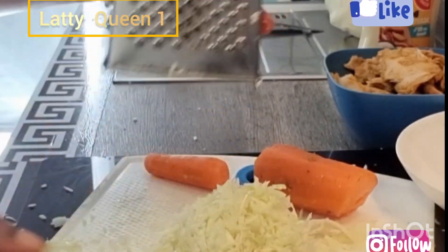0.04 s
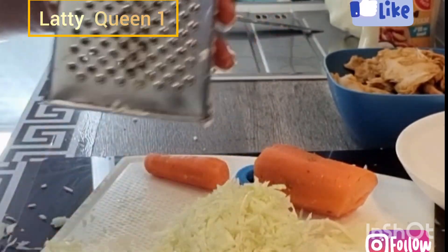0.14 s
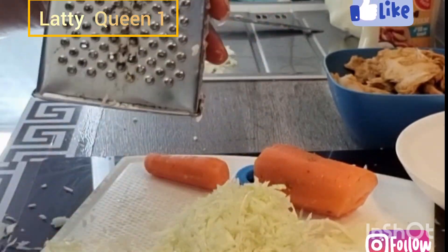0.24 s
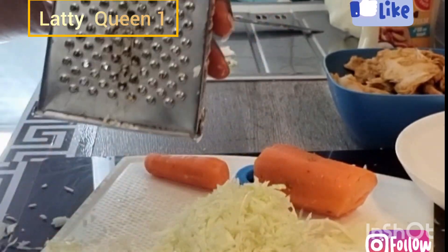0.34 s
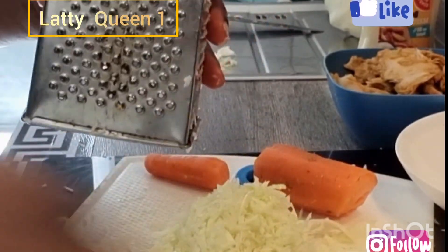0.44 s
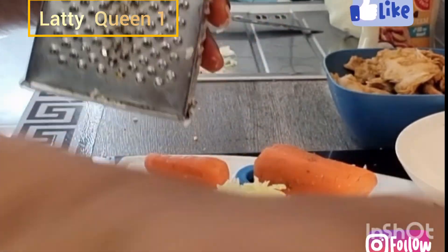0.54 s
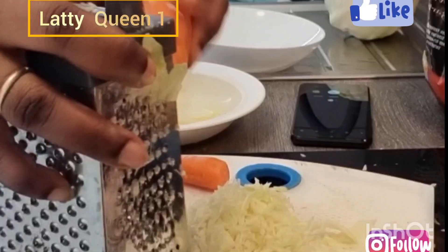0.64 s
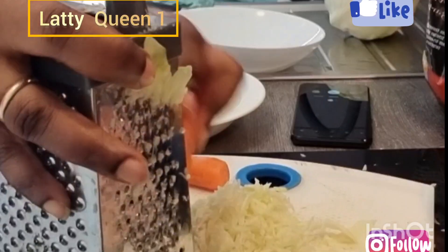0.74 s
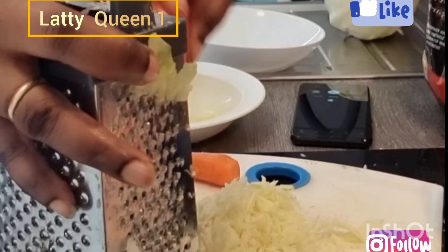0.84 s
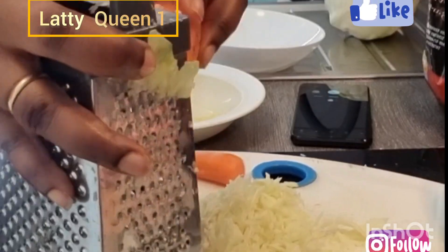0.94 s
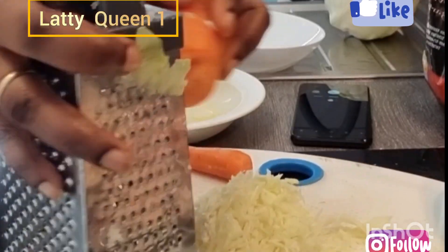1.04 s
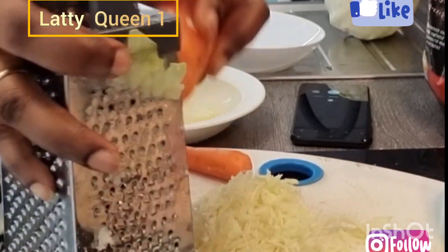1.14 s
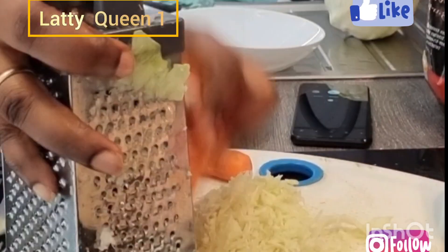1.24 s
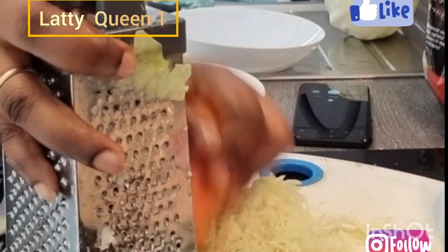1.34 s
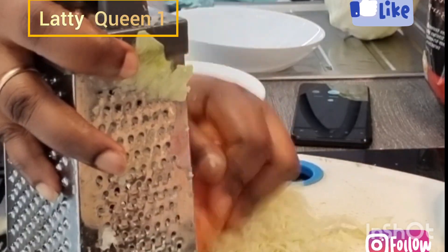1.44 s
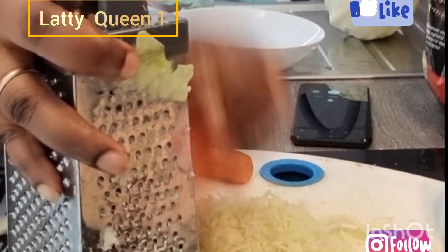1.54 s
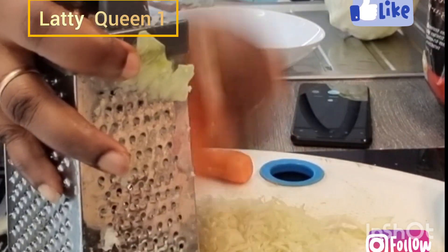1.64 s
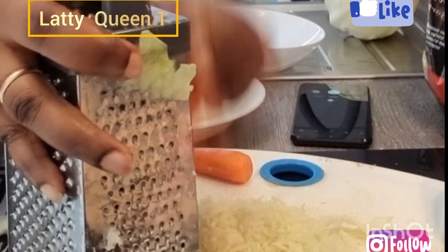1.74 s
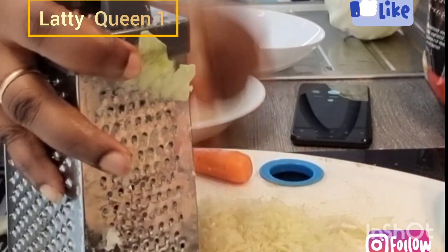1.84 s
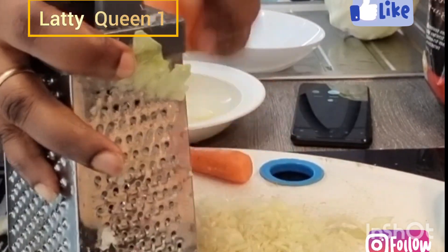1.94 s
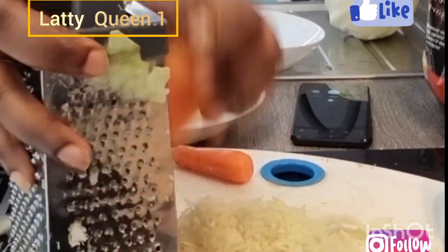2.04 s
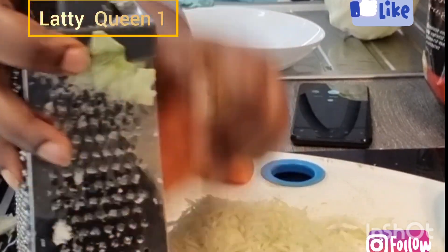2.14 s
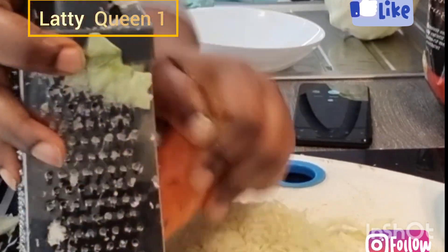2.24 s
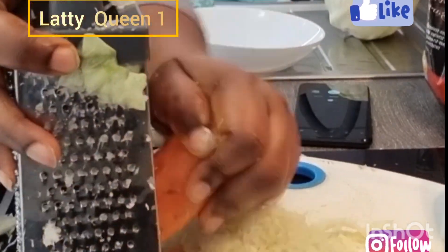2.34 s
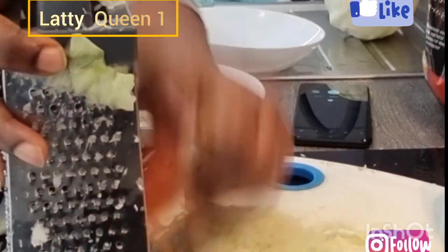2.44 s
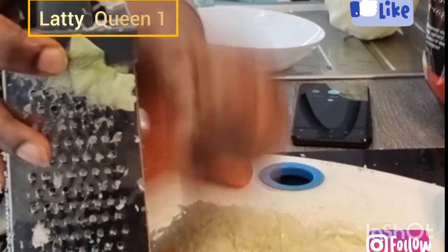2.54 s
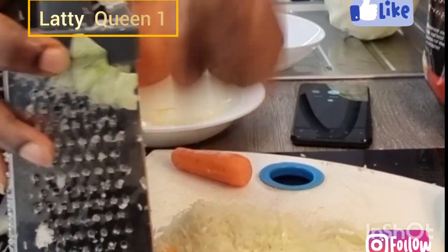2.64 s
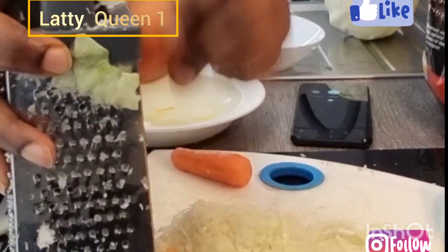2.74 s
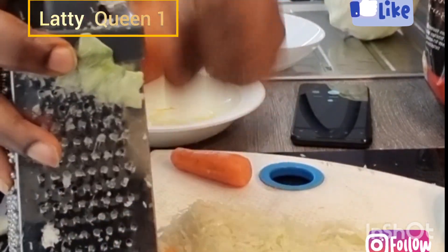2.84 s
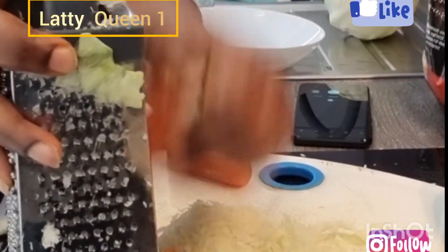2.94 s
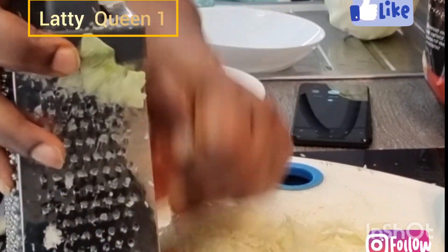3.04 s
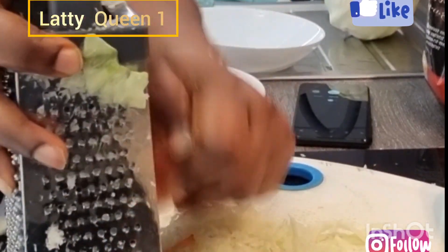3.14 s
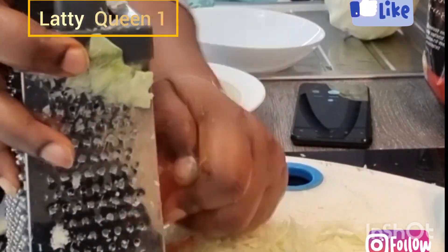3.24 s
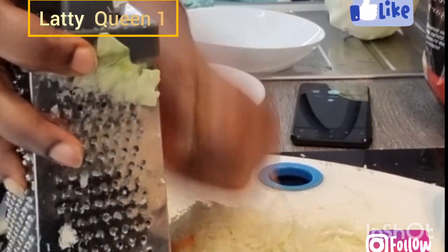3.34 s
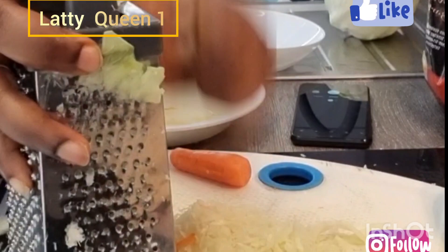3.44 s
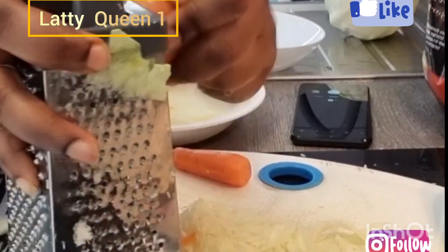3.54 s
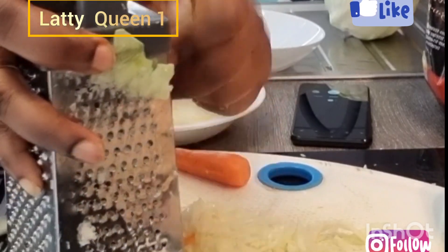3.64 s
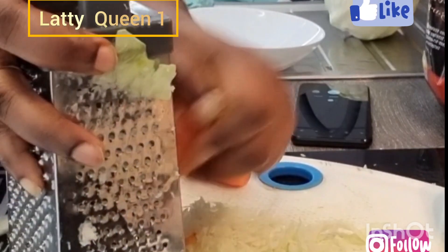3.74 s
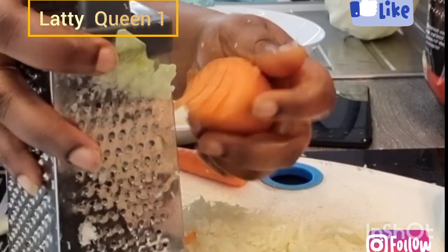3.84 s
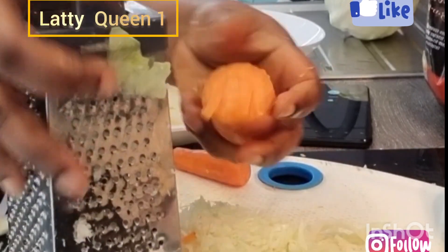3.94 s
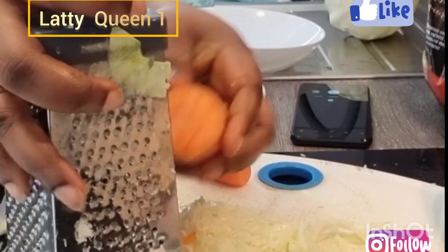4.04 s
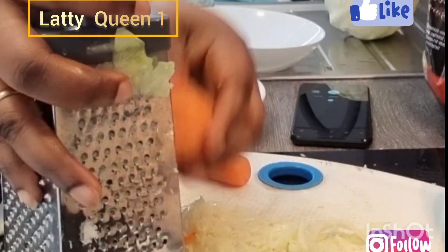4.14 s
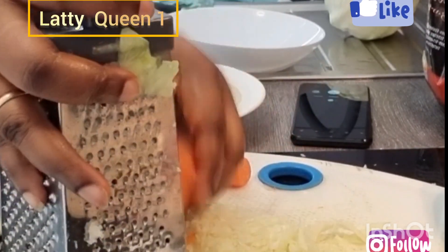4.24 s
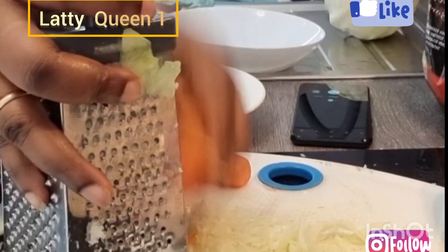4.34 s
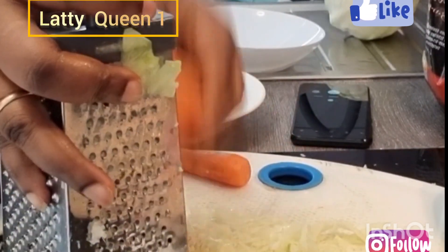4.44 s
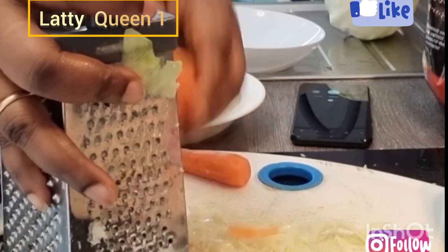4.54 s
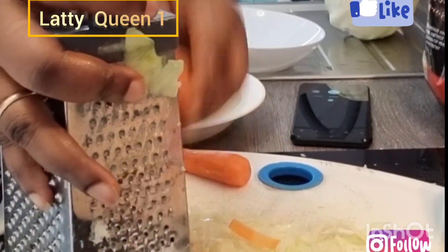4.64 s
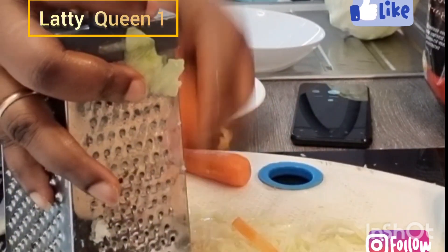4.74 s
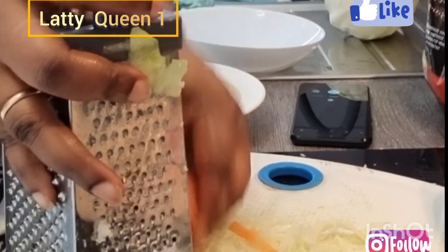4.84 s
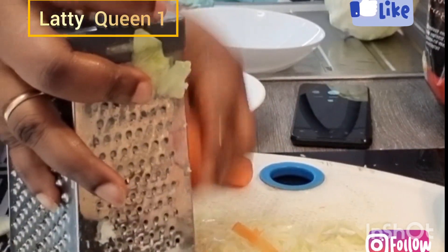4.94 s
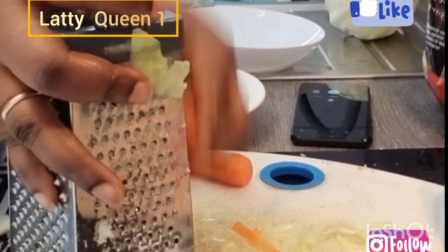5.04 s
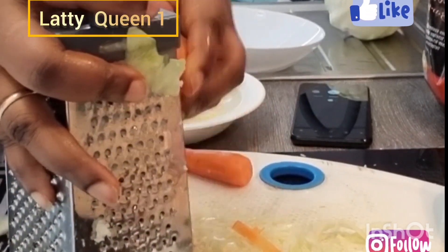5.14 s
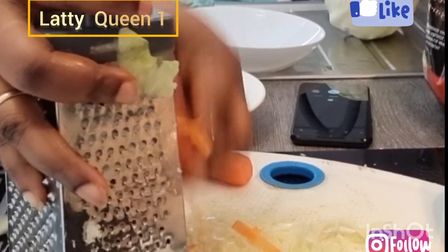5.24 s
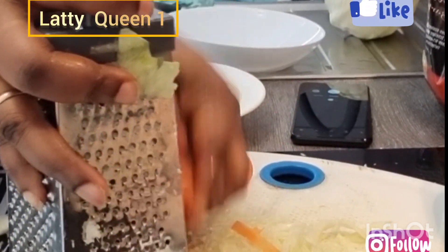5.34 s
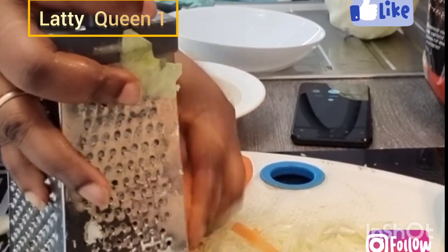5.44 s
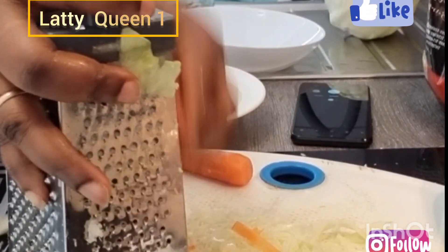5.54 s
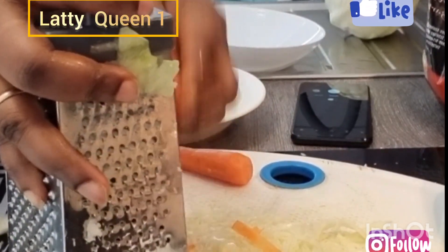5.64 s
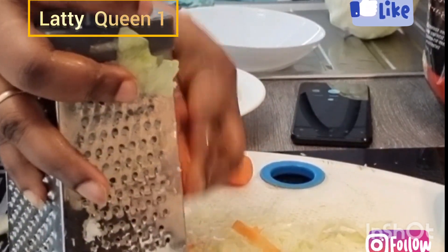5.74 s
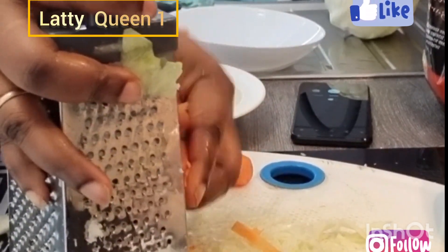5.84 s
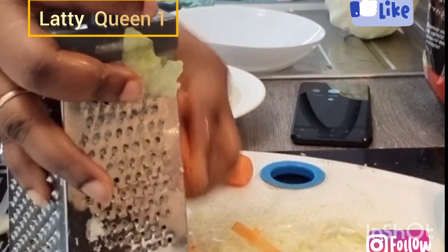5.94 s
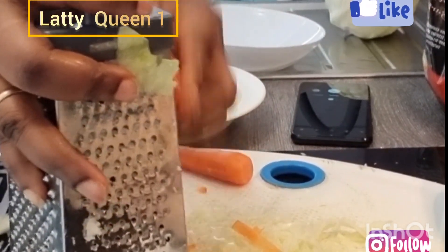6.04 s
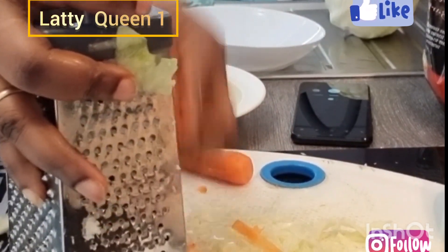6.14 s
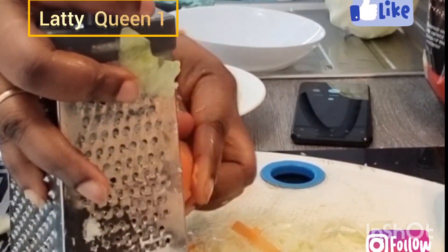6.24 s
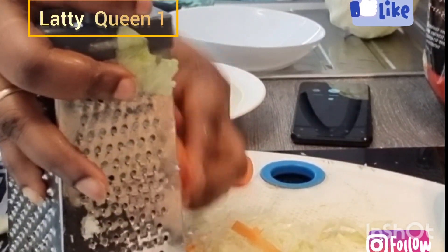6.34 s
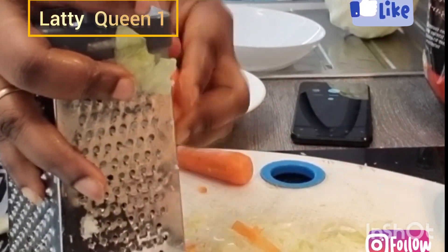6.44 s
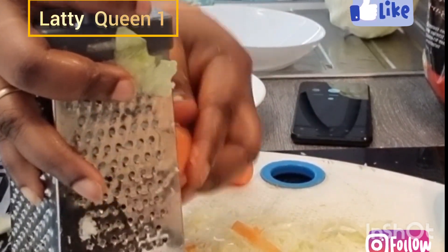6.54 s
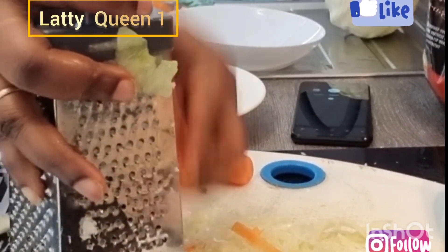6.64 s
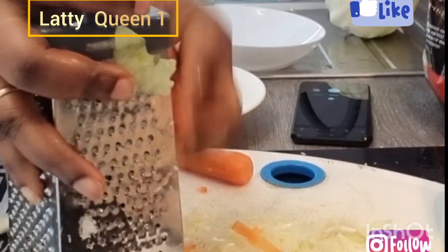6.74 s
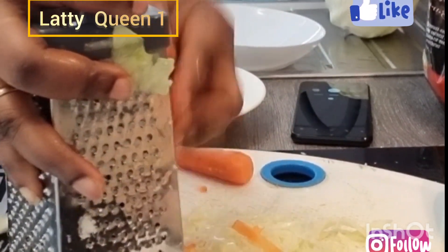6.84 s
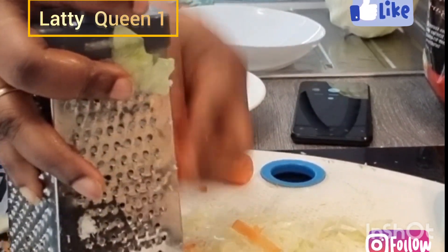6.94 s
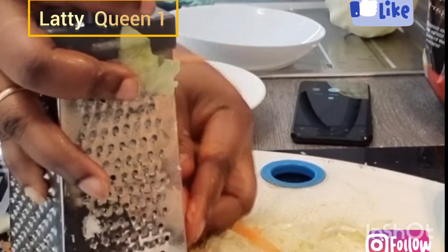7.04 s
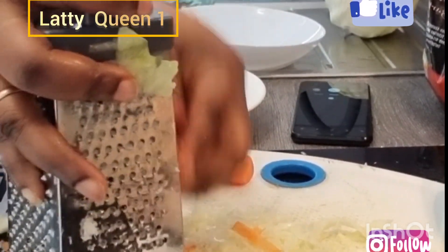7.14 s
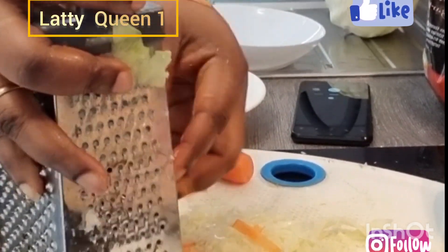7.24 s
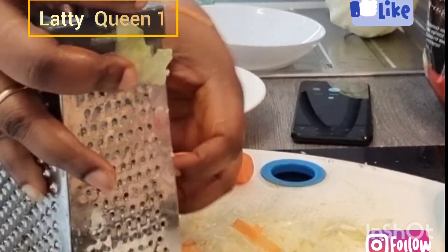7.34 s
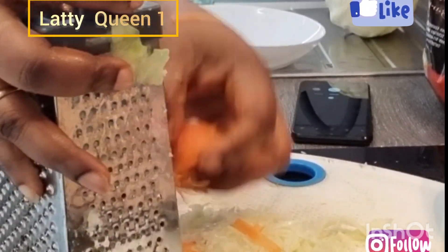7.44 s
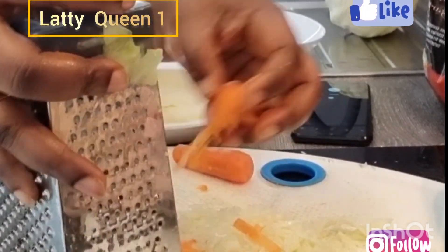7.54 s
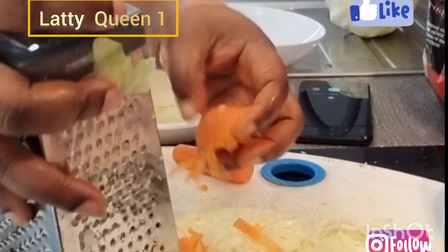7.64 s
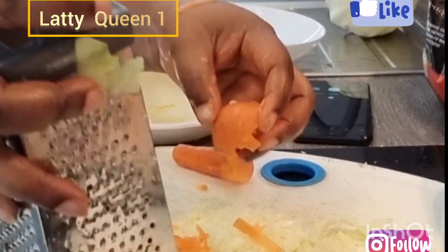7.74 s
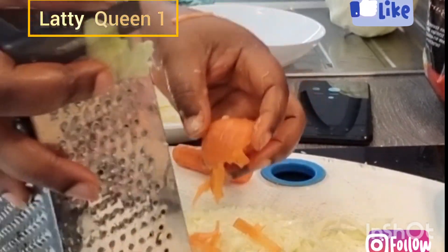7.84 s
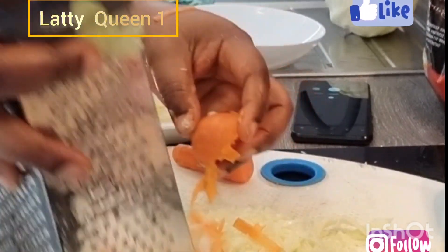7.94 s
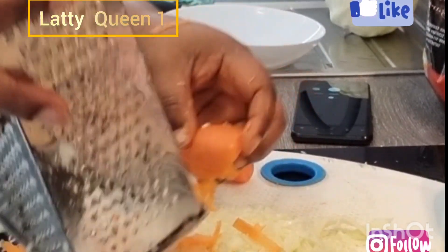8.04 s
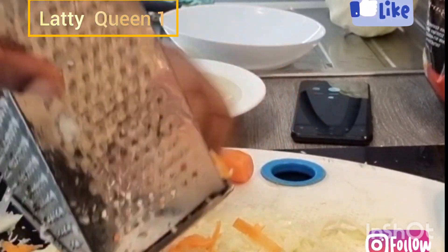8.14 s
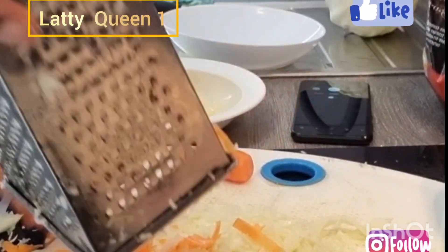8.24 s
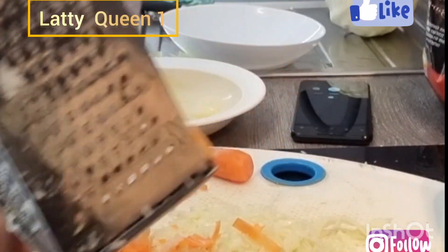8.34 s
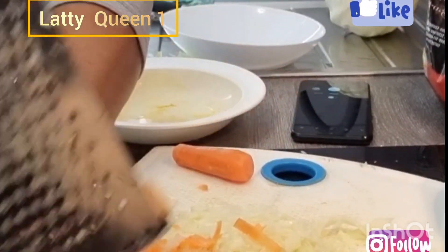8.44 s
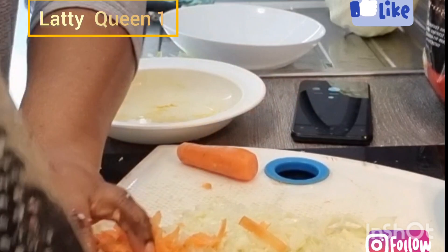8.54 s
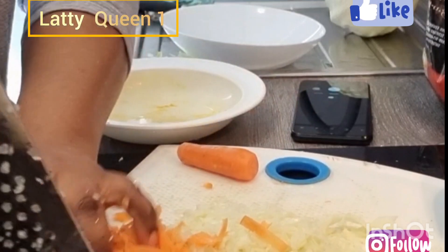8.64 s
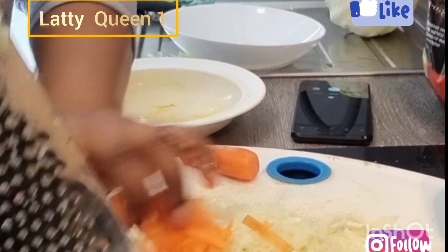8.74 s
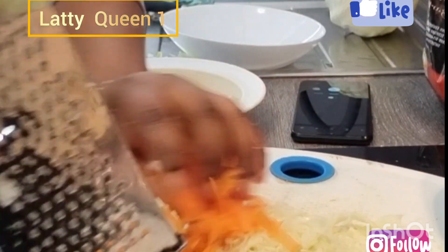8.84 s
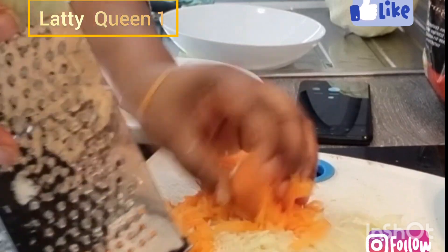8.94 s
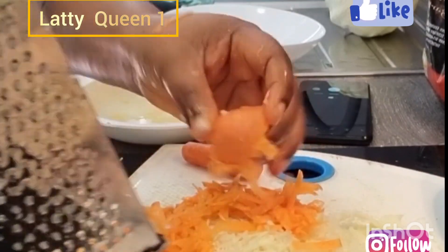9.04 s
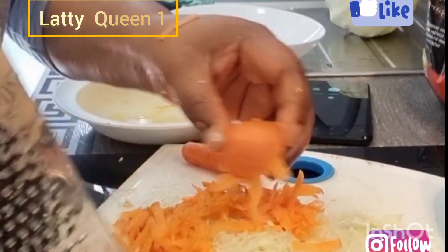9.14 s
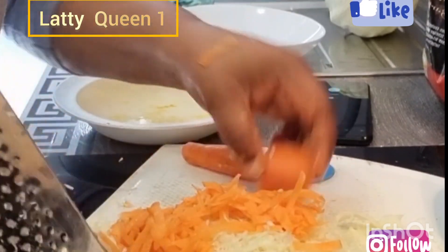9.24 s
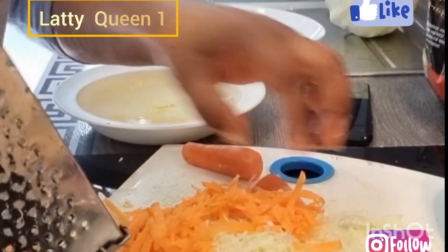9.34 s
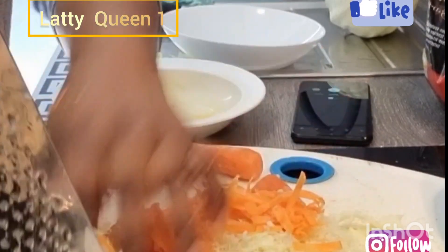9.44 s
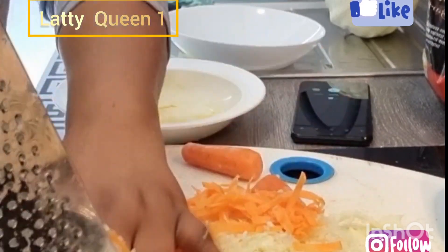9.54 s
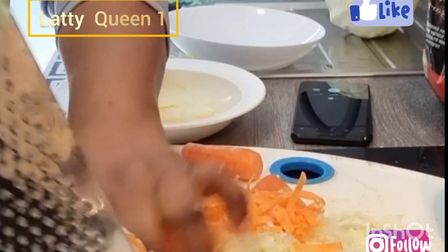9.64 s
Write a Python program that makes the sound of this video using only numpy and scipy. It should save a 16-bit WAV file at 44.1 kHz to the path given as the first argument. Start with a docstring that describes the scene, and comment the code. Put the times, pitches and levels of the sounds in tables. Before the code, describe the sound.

In a kitchen, hands briefly brush a steel box grater as it is set on a chopping board. A carrot is then rasped quickly up and down, close to the microphone, with gritty bites, hollow knocks and dull board thuds. After a short pause comes a second, longer run. A faint thin squeak and a few soft bumps and brushes follow. A low motor hum continues throughout.

```python
"""Grating a carrot in the kitchen

A steel box grater stands on a chopping board, close to a phone's two microphones. A carrot is rasped
fast up and down it: the teeth bite in dense grains, the thin walls ring, the hollow box knocks and the
board thuds. Hands brush things before and after, and the grater squeaks as it tips. Behind it all
are the air of the room and a humming motor."""
import sys
import numpy as np
from scipy import signal
from scipy.fft import rfft, irfft, next_fast_len
from scipy.io import wavfile
from scipy.ndimage import uniform_filter1d, map_coordinates

SR = 44100
rng = np.random.default_rng(int(sys.argv[2]) if len(sys.argv) > 2 else 0)


def dump_mix(stems):
    """Bounce the given channels to the path in sys.argv[1] as a 16-bit WAV at rate SR."""
    frames = np.atleast_2d(stems).T  # one column per channel
    limited = np.clip(frames, -1, 1)  # hard clip at full scale
    pcm = np.round(limited * 32767).astype(np.int16)
    wavfile.write(sys.argv[1], SR, pcm)


N = 427547

# Background noises. Each row: frequency in Hz, relative level in dB.
AIR_COLOUR = [(76, -34), (130, -3.5), (162, -10), (250, -22), (310, -17.5), (384, -14.5), (519, -16),
              (673, -23), (744, -20.5), (1600, -25.5), (1870, -28.5), (3280, -30.5), (8000, -42),
              (9300, -45.5), (11200, -53), (12900, -43), (15700, -46.5)]
RUSTLE_COLOUR = [(180, -32.5), (300, -3.5), (454, -9), (508, -9), (548, -3.5), (1510, -3), (3290, -16.5),
                 (6000, -37.5), (7800, -63.5), (13200, -120)]
RUMBLE_COLOUR = [(12, -38.5), (20, -0.5), (59, 4), (87, -1), (108, -9), (128, -12), (151, -12),
                 (178, -17.5), (200, -21), (260, -53.5), (440, -120)]
TICK_COLOUR = [(5000, -30), (7500, 0), (10500, -5), (13000, 3), (15700, -7.5)]
# A soft opening rustle and faint treble ticks. Each row: time in seconds, level in dB.
RUSTLE_LEVEL = [(0, -58.5), (.4, -58), (.7, -55), (1.2, -57.5), (1.6, -86)]
TICKS = [(3.908, -71), (3.935, -72), (7.45, -78), (8.455, -78.5), (8.727, -79), (9.145, -79)]
# The motor's drift. Each row: time in seconds, pitch in Hz.
MOTOR_PITCH = [(0, 109.3), (.6, 112.5), (.7, 100.2), (1.1, 102.4), (3.8, 103.9), (8.3, 104), (8.5, 101.9),
               (9.69, 105)]
# Its overtones. Each row: multiple of the pitch, level in dB against the fundamental.
MOTOR_OVERTONES = [(.5, -8), (1.5, -21.5), (3, -31.5), (3.5, -31.5), (4, -25), (5, -23), (5.5, -27),
                   (6, -31.5), (7, -29.5), (9, -34.5)]
# The room's decay. Each row: frequency in Hz, seconds to fall 60 dB.
KITCHEN_T60 = [(200, .3), (1000, .25), (4000, .2), (12000, .1)]
# Room air and close sounds across the microphones. Each row: frequency in Hz, left-right likeness.
AIR_LIKENESS = [(60, 0.95), (150, 0.71), (300, 0.51), (700, 0.42), (1400, .1), (15000, 0.015)]
NEAR_LIKENESS = [(60, 1), (150, .96), (280, 0.65), (700, 0.72), (1500, 0.28), (4000, 0.21), (12000, .15)]
# Their lean to one side. Each row: frequency in Hz, left over right in dB.
AIR_BALANCE = [(60, 0.5), (110, -1), (200, -3), (380, 2), (700, 1), (1290, 0.5), (2380, 1), (4400, 1.5),
               (8120, 2.5), (15000, -7)]
NEAR_BALANCE = [(60, -2.5), (110, -1.5), (200, -2.5), (380, -2), (700, 0.5), (1290, -1.5), (2380, 1),
                (4400, 1), (8120, 1.5), (15000, -7)]

# Friction of a light brush, a hand on steel, the duller return stroke and the bright bite of the teeth.
# Each row: frequency in Hz, relative level in dB.
BRUSH_COLOUR = [(1290, -38.5), (2200, 0), (4650, 0.5), (6000, -1), (6410, -9), (7800, -7), (10200, -19),
                (13000, -20), (15700, -19)]
STEEL_COLOUR = [(1290, -30), (2200, 2), (4650, 1.5), (6000, -4), (7800, -7), (10200, -18), (13000, -14),
                (15700, -15)]
SLIDE_COLOUR = [(1290, -19), (2200, -3), (3750, -2.5), (5350, -4), (8000, -7), (8900, -11.5),
                (10700, -15.5), (13200, -13), (15700, -13)]
TEETH_COLOUR = [(1290, -16.5), (2200, -4), (2610, -5.5), (2980, -2.5), (3750, -6.5), (4250, -3),
                (5350, -1.5), (6620, -5), (8000, -4), (8900, -10), (10700, -13), (13200, -9), (15700, -11)]
# Resonances of the board on its table, the grater's walls and each kind of handling.
# Each row: frequency in Hz, width in Hz, relative level in dB.
BOARD_MODES = [(55.6, 83, -8.5), (94.6, 28.2, 0.5), (147.4, 36.6, -2.5), (195.7, 64, -7), (270, 90, -14.5)]
WALL_MODES = [(323.3, 90, -12.5), (406.5, 110, -8), (477, 63, -8), (720, 114, -1.5), (1004, 98, -1),
              (1190, 75, -1.5), (1344, 88, -1.5), (1550, 99, -1.5), (1844, 310, -10), (2340, 170, -5),
              (2860, 220, -11.5), (2970, 66, -7.5), (4320, 170, -10.5), (5210, 69, -16.5), (7030, 36, -15)]
GRIP_MODES = [(945, 300, -8), (1336, 260, -6), (2400, 600, -1), (3400, 900, 0), (4500, 700, -3)]
SHRED_MODES = [(422, 240, 0), (940, 250, 1.5), (1350, 300, 4.5), (2280, 980, -6)]
SCRAPE_MODES = [(1013, 73, -8), (1260, 75, -2.5), (2130, 110, -10), (3400, 190, -4), (4000, 96, -12),
                (5400, 230, -14)]
BUMP_MODES = [(347, 126, 3), (503, 200, -0.5), (800, 300, -7), (1400, 610, -15)]
POP_MODES = [(1370, 170, 0), (1900, 350, -7)]
# How far a change of grip moves the tone. Each row: frequency in Hz, share of the full depth.
SHIFT_SHARE = [(200, .1), (500, 0.88), (2000, 0.91), (15000, 0.85)]

# Handling. Each row: start and length in seconds, rasp in dB, ring in dB above the rasp, thud in dB.
GRIPS = [(.645, .036, -56.5, -3, -51), (.696, .041, -41, -6, -45), (.74, 0.02, -57, 2, -61.5),
         (.765, .061, -51, 4, -60), (.822, .034, -57, 0, -67), (.89, .07, -56, 4, -75),
         (.98, .063, -64, 6, -57.5), (1.05, .0384, -75, 8, -43)]  # hands turn the grater and set it up
TOUCHES = [(7.2, 0.035, -56, -11, -67), (7.272, 0.037, -62, 4.5, -59), (7.318, 0.041, -61, -2, -63),
           (9.533, 0.04, -60, 5, -53.5), (9.579, 0.025, -52.5, 6.5, -71), (9.61, 0.0098, -61.5, 6, -66)]  # hands brush shreds and board
SCRAPE = [(9.279, 0.029, -58, 12, -62)]  # short and ringing
BUMPS = [(8.374, 0.012, -57.5, 6, -48.5), (8.47, 0.014, -77, 16, -53), (9.351, .014, -75, 23.7, -48)]  # soft, on the board
POP = [(8.009, .016, -80, 20, -72)]
# The tipping grater. Each row: time in seconds, pitch in Hz, level in dB, top band in dB against that.
SQUEAK_GLIDE = [(7.7, 3430, -100, -8.5), (7.8, 3420, -88, -4), (7.86, 3370, -78, -9), (7.9, 3350, -75, -9),
                (7.945, 3340, -65, -12), (7.98, 3320, -73, -10), (8.025, 3270, -67, -11),
                (8.06, 3270, -69, -8), (8.12, 3240, -68, -13), (8.16, 3140, -66, -20),
                (8.2, 3120, -76.5, -14), (8.27, 3070, -83, -14), (8.32, 3070, -100, -14)]
# The squeak's lower bands. Each row: ratio to the pitch, relative level in dB, blur in Hz.
SQUEAK_BANDS = [(.82, -5.5, 600), (1., 1, 170.6)]

# The carrot strikes the wall. Each row: start in seconds, level in dB, pitch in Hz, contact in seconds.
KNOCKS = [(1.182, -27.5, 703, 0.0091), (1.413, -31, 756, 0.02), (1.573, -24.5, 702, 0.013),
          (1.693, -30, 740, 0.0082), (1.829, -25, 743, 0.014), (2.154, -39, 743, 0.013),
          (2.208, -30, 730, 0.0089), (2.257, -30.5, 774, 0.013), (2.409, -26.5, 740, 0.014),
          (2.637, -29, 740, 0.014), (2.763, -30, 703, 0.014), (2.808, -28, 799, 0.013),
          (3.096, -30, 680, 0.012), (3.213, -27.5, 766, 0.02), (3.382, -30.5, 642, 0.0097),
          (3.443, -27.5, 762, 0.011), (3.569, -25.5, 708, 0.0082), (4.123, -48.5, 737, 0.011),
          (4.147, -46, 673, 0.0082), (4.32, -30, 734, 0.016), (4.444, -33, 773, 0.011),
          (4.674, -27.5, 702, 0.013), (4.744, -24.5, 703, 0.012), (4.926, -24.5, 770, 0.0072),
          (5.233, -31.5, 726, 0.015), (5.284, -29, 805, 0.012), (5.353, -32.5, 702, 0.01),
          (5.423, -31, 718, 0.012), (5.494, -31.5, 767, 0.016), (5.662, -31, 704, 0.021),
          (5.735, -31, 713, 0.017), (5.879, -33.5, 761, 0.013), (5.927, -29, 745, 0.017),
          (6.421, -30, 683, 0.011), (6.61, -29.5, 690, 0.012), (6.739, -29, 705, 0.014),
          (6.816, -31, 718, 0.014), (6.87, -33, 756, 0.012), (7.001, -29.5, 759, 0.014),
          (7.08, -28.5, 763, 0.012)]
# Light return strokes and first contacts.
# Each row: start and length in seconds, rasp in dB, relative wall ring in dB.
UPSTROKES = [(1.246, 0.04, -44, 2.5), (1.284, 0.014, -33.5, -2.5), (1.337, 0.053, -41.5, 0),
             (1.457, 0.037, -40.5, 4.5), (1.574, 0.02, -40.5, 6.5), (1.682, 0.016, -38, 6),
             (1.777, 0.034, -32, -3), (1.884, 0.044, -37.5, -2), (1.996, 0.069, -43.5, -0.5),
             (2.146, 0.03, -40, 3), (2.243, 0.031, -35, 0), (2.362, 0.019, -36.5, -2),
             (2.471, 0.042, -37.5, -3), (2.578, 0.026, -37, -0.5), (2.684, 0.06, -43, 0.5),
             (2.807, 0.046, -38, -0.5), (2.912, 0.044, -40, -4), (3.036, 0.05, -38, -3),
             (3.145, 0.033, -36, 0), (3.259, 0.044, -39, -2.5), (3.369, 0.036, -36, -1.5),
             (3.5, 0.04, -39.5, 3), (3.595, 0.038, -36.5, -2), (4.118, 0.018, -54.5, -5),
             (4.143, 0.011, -50.5, -10), (4.238, 0.055, -44.5, 1), (4.375, 0.037, -40, 2),
             (4.493, 0.03, -38, 1), (4.607, 0.034, -36.5, 1.5), (4.741, 0.02, -31, -1),
             (4.854, 0.038, -34.5, 1), (4.988, 0.029, -34.5, -1.5), (5.103, 0.046, -37, -1),
             (5.23, 0.033, -34.5, -0.5), (5.355, 0.031, -34, 0), (5.489, 0.037, -35.5, -0.5),
             (5.612, 0.036, -38, -0.5), (5.741, 0.027, -35, -3.5), (5.875, 0.021, -33, 0),
             (6.012, 0.035, -40, 0.5), (6.133, 0.037, -36.5, 2), (6.295, 0.0078, -37.5, -4.5),
             (6.422, 0.041, -35.5, 0.5), (6.56, 0.033, -39, -0.5), (6.69, 0.039, -35.5, 1),
             (6.806, 0.044, -38, -2), (6.946, 0.035, -39.5, 2), (7.069, 0.048, -35.5, -3.5)]
# Strokes against the teeth.
# Each row: start, length and rise in seconds, rasp in dB, ring in dB above the rasp, thud in dB.
DOWNSTROKES = [(1.1809, 0.036, 0.0069, -33.5, -7, -45.5), (1.3064, 0.027, 0.0147, -27, -8.5, -32),
               (1.4099, 0.029, 0.023, -27, -1.5, -32.5), (1.5084, 0.05, 0.0272, -31.5, -4, -29),
               (1.6284, 0.04, 0.0272, -26, -5.5, -29.5), (1.7279, 0.031, 0.0092, -25, -4, -31),
               (1.8264, 0.034, 0.004, -25, -4.5, -37.5), (1.9389, 0.04, 0.0147, -29, -5, -31.5),
               (2.0874, 0.03, 0.013, -25, -4.5, -34.5), (2.1854, 0.043, 0.0272, -29, -6, -31.5),
               (2.3104, 0.032, 0.02, -25, -3, -34), (2.4079, 0.033, 0.0068, -23.5, -1, -32.5),
               (2.5249, 0.041, 0.015, -27.5, -4, -33.5), (2.6339, 0.031, 0.0041, -23, -2, -29),
               (2.7584, 0.03, 0.0272, -24, -2, -31), (2.8619, 0.04, 0.0147, -27.5, -3.5, -34),
               (2.9809, 0.039, 0.0272, -27.5, -1.5, -30.0), (3.0894, 0.03, 0.0204, -24.5, -8, -34),
               (3.2134, 0.029, 0.0045, -24, -6.5, -33.5), (3.3224, 0.032, 0.0272, -27.5, -6.5, -32),
               (3.4399, 0.029, 0.0045, -23, -4, -32.5), (3.5529, 0.04, 0.0272, -27.0, -2.5, -33),
               (3.6664, 0.027, 0.0068, -24, -7.5, -28.5), (4.2039, 0.032, 0.0023, -34, -1, -39),
               (4.3209, 0.023, 0.022, -28, -4.5, -34), (4.4409, 0.034, 0.0204, -31, -3.5, -35),
               (4.5389, 0.058, 0.0272, -35.5, 0, -39), (4.6679, 0.041, 0.0102, -30.0, -5.5, -36.5),
               (4.7904, 0.038, 0.021, -27, -4, -35.5), (4.9044, 0.045, 0.0068, -31, -5, -34.0),
               (5.0344, 0.041, 0.027, -29, -4, -37.5), (5.1544, 0.039, 0.0081, -28, -4, -32),
               (5.2854, 0.035, 0.017, -26.5, -2, -31.5), (5.4164, 0.034, 0.014, -28.5, 0, -32.5),
               (5.5319, 0.032, 0.0102, -26.5, -6, -35), (5.6619, 0.032, 0.0062, -27.5, -1.5, -32),
               (5.7969, 0.03, 0.0147, -29, -2.5, -34), (5.9029, 0.069, 0.0272, -30.5, -2.5, -35),
               (6.0534, 0.04, 0.0068, -28.5, -2, -34.5), (6.1944, 0.034, 0.0147, -29.5, -1.5, -32),
               (6.3454, 0.025, 0.0102, -28.5, -1.5, -33.5), (6.4644, 0.053, 0.002, -34, -1.5, -34.5),
               (6.6109, 0.042, 0.0087, -26.5, -1, -34.5), (6.7349, 0.041, 0.0086, -31, -1.5, -37.5),
               (6.8664, 0.043, 0.018, -31.5, -0.5, -34), (6.9969, 0.042, 0.014, -27, -2.5, -34.5),
               (7.1184, 0.043, 0.002, -31.5, -4, -36.5)]
# The carrot leaves the steel at these times, in seconds.
LIFTS = [3.72, 6.25, 6.385, 7.18]

DRAG_T60_S, DRAG_RING_DB, LIFT_FADE_S = .29, -9, .022  # the loose slide after a rub hardly rings
SNAPS_PER_S, SNAP_DB = 400, 7  # single fibres snap on a tooth
SHUDDER_HZ, SHUDDER_SPREAD_HZ, SHUDDER_DB = 89.95, 45, -15.5  # the push slips at an unsteady rate


def amp(db):
    """Gain of a level in dB."""
    return 10 ** (np.asarray(db) / 20)


def unit(x):
    """x at rms 1."""
    return x / np.sqrt(np.mean(x ** 2) + 1e-20)


def along(points, hz):
    """Values between (Hz, value) points, on a log frequency axis."""
    freqs, values = np.transpose(points)
    return np.interp(np.log(hz + 1), np.log(freqs + 1), values)


def curves(rows):
    """One value per sample for each column after the time."""
    times, *columns = np.transpose(rows)
    return [np.interp(np.arange(N) / SR, times, column) for column in columns]


def wobble(rate):
    """A smooth random curve with rate knots a second."""
    return map_coordinates(rng.standard_normal(int(N * rate / SR) + 4), [np.arange(N) * rate / SR])


def filtered(x, response):
    """x through a frequency response."""
    size = next_fast_len(N + SR // 2)
    return irfft(rfft(x, size) * response(np.fft.rfftfreq(size, 1 / SR)), size)[..., :N]


def coloured(x, colour):
    """x shaped by a (Hz, dB) spectrum; white noise keeps its level."""
    return filtered(x, lambda hz: unit(amp(along(colour, hz))))


def resonate(x, modes):
    """x rings damped resonances of alternating sign; white noise keeps its level."""
    def response(hz):
        total = sum((-1) ** k * amp(db) * 1j * hz * width / (centre ** 2 - hz ** 2 + 1j * hz * width)
                    for k, (centre, width, db) in enumerate(modes))
        return total / np.sqrt(np.mean(np.abs(total) ** 2))
    return filtered(x, response)


def microphones(pair, likeness, balance, left_lag_s=0):
    """Two signals blend into left and right, with likeness and balance set by frequency."""
    size = next_fast_len(N + SR // 2)
    hz, sign = np.fft.rfftfreq(size, 1 / SR), np.array([[1], [-1]])
    mid, side = rfft(pair, size)
    spread = np.arccos(np.clip(along(likeness, hz), -1, 1)) / 2
    blend = mid * np.cos(spread) + sign * side * np.sin(spread)
    gain = amp(sign * along(balance, hz) / 2)
    delay = np.exp(-1j * np.pi * sign * hz * left_lag_s)
    return irfft(blend * gain * delay, size)[:, :N]


def room_air(tick_s=.012, whine_hz=14465):
    """Room tone all around, with a thin whine, faint ticks and a rustle that fades early."""
    noise = lambda colour: coloured(rng.standard_normal((2, N)), colour)
    t = np.arange(N) / SR
    rustle_db, = curves(RUSTLE_LEVEL)
    air = amp(-62 + .41 * wobble(4.1)) * noise(AIR_COLOUR)
    rustle = amp(rustle_db + 1.1 * wobble(25)) * noise(RUSTLE_COLOUR)
    ticks = sum(amp(db) * np.exp(-((t - at) / tick_s) ** 2) for at, db in TICKS) * noise(TICK_COLOUR)
    whine = amp(-95) * np.sin(2 * np.pi * whine_hz * t)
    return microphones(air + rustle + ticks, AIR_LIKENESS, AIR_BALANCE) + whine


def motor():
    """A motor hums unsteadily over a low rumble, a little louder in the right microphone."""
    pitch_hz, = curves(MOTOR_PITCH)
    phase = 2 * np.pi * np.cumsum(pitch_hz + 1.1 * wobble(8)) / SR
    fundamental = amp(1.5 * wobble(13)) * np.sin(phase)
    overtones = sum(amp(db + 1.8 * wobble(6.4)) * np.sin(k * phase) for k, db in MOTOR_OVERTONES)
    hum = amp(-52) * np.sqrt(2) * (fundamental + overtones)
    rumble = amp(-57.5) * coloured(rng.standard_normal(N), RUMBLE_COLOUR)
    return (hum + rumble) * amp([[.1], [1.9]])


def kitchen_reverb(x):
    """The room answers with a short tail whose treble dies first."""
    hz, t, spectra = signal.stft(rng.standard_normal((2, SR // 4)), SR, nperseg=256)
    decay = amp(-60 * t / along(KITCHEN_T60, hz)[:, None])
    tail = signal.istft(spectra * decay, SR, nperseg=256)[1]
    return signal.fftconvolve(x, tail / np.linalg.norm(tail[0]), axes=1)[:, :N]


def contact_forces(rows, release_s, swell_db, drag_db):
    """Rasp, ring and thud envelopes of rubs laid out as DOWNSTROKES: press, hold, then slide loosely."""
    rasp, ring, thud = np.zeros((3, N + SR))
    for start, length, rise, rasp_db, ring_db, thud_db in rows:
        t = np.arange(SR // 4) / SR - .6 * rise
        onset = np.clip(t / rise + .59, 0, 1) ** 1.32  # pressure creeps in, then climbs fast
        swell = amp(swell_db * (np.clip(t / length, 0, 1) - .5))
        held = swell * np.clip((length - t) / release_s + .5, 0, 1)
        next_lift = min(end for end in LIFTS + [N / SR] if end > start)
        drag = amp(drag_db - 60 * np.clip(t - length, 0, None) / DRAG_T60_S)
        drag *= np.clip((next_lift - start - t) / LIFT_FADE_S + 1, 0, 1)
        pressure = onset * np.hypot(held, drag)
        ring_pressure = onset * np.hypot(held, amp(DRAG_RING_DB) * drag)
        first = round((start + t[0]) * SR)
        span = slice(first, first + len(t))
        rasp[span] = np.hypot(rasp[span], amp(rasp_db) * pressure)
        ring[span] = np.hypot(ring[span], amp(rasp_db + ring_db) * ring_pressure)
        thud[span] = np.hypot(thud[span], amp(thud_db) * pressure)
    return rasp[:N], ring[:N], thud[:N]


def rubbing(forces, colour, modes, grain_db, row_db):
    """Grainy friction hisses and rings the body, while the slipping push shakes the board."""
    rasp, ring, thud = forces
    snaps = np.convolve(rng.random(N) < SNAPS_PER_S / SR, np.hanning(9), "same")
    # Single teeth catch within a millisecond; rows of teeth come every few milliseconds.
    bite = unit(amp(grain_db * wobble(2500) + row_db * wobble(220) + SNAP_DB * snaps))
    slip_hz = SHUDDER_HZ + SHUDDER_SPREAD_HZ * np.array([wobble(70), wobble(70)])
    shudder = amp(SHUDDER_DB) * signal.sawtooth(2 * np.pi * np.cumsum(slip_hz, axis=1) / SR)
    hiss = coloured(rasp * bite * rng.standard_normal((2, N)), colour)
    body = resonate(ring * bite * rng.standard_normal((2, N)), modes)
    return hiss + body + resonate(thud * shudder, BOARD_MODES)


def shifting_contact(x, depth_db):
    """Grip and point of contact change which resonances speak; the board's bass barely moves."""
    hz, _, spectra = signal.stft(x, SR, nperseg=512)
    drift = uniform_filter1d(rng.standard_normal(spectra.shape[1:]), size=3, axis=0)  # across frequency
    drift = unit(uniform_filter1d(drift, size=6, axis=1))  # across time
    gain = unit(amp(depth_db * along(SHIFT_SHARE, hz)[:, None] * drift))
    return signal.istft(spectra * gain, nperseg=512)[1][:, :N]


def squeak():
    """The grater tips over its edge: thin, rough bands slip unevenly and glide down together."""
    pitch_hz, level_db, top_db = curves(SQUEAK_GLIDE)
    phase = 2 * np.pi * np.cumsum(pitch_hz + 18 * wobble(25)) / SR

    def band(ratio, blur_hz):
        return wobble(blur_hz) * np.sin(ratio * phase) + wobble(blur_hz) * np.cos(ratio * phase)
    lower = sum(amp(db) * band(ratio, blur_hz) for ratio, db, blur_hz in SQUEAK_BANDS)
    top = amp(top_db) * band(ratio=1.75, blur_hz=450)
    return amp(level_db + 2.2 * wobble(40)) * (lower + top)


def handling(rows, colour, modes, rise_s=.0105):
    """Light touches of the hands, each a brief, soft rub."""
    rubs = [(start, length, min(rise_s, length / 2), *levels) for start, length, *levels in rows]
    forces = contact_forces(rubs, release_s=.016, swell_db=-2, drag_db=-15)
    return rubbing(forces, colour, modes, grain_db=1, row_db=.9)


def hollow_box(rise_s=.002, t60_s=.026, waver_hz=40):
    """Each knock sounds the box at the pitch the grip allows, as long as the contact lasts, then dies."""
    box, t = np.zeros(N + SR), np.arange(SR // 8) / SR
    waver = 2 * np.pi * np.cumsum(waver_hz * wobble(90)) / SR
    for start, db, hz, contact in KNOCKS:
        span = slice(round(start * SR), round(start * SR) + len(t))
        attack = 1 - np.exp(-t / rise_s)
        decay = amp(db - 2 - 60 * np.clip(t - contact, 0, None) / t60_s)
        box[span] += attack * decay * np.sin(2 * np.pi * hz * t + waver[span])
    return box[:N] * amp(1.9 * wobble(150)) * [[1], [.3]]


def grating(up_rise_s=.031, knock_s=.0087, knock_ring_db=14):
    """Downstrokes bite into the teeth; lighter return strokes slide, and knocks ring the walls."""
    returns = [(start, length, min(up_rise_s, length), db, ring_db + 1, db - 6.5)
               for start, length, db, ring_db in UPSTROKES]
    knocks = [(start, knock_s, .002, db - 9 - knock_ring_db, knock_ring_db, db - 19)
              for start, db, *_ in KNOCKS]
    down = contact_forces(DOWNSTROKES, release_s=.0063, swell_db=-2, drag_db=-11.5)
    up = contact_forces(returns + knocks, release_s=.013, swell_db=-3.5, drag_db=-5.5)
    bites = rubbing(down, TEETH_COLOUR, WALL_MODES, grain_db=1.64, row_db=.43)
    slides = rubbing(up, SLIDE_COLOUR, WALL_MODES, grain_db=1, row_db=1)
    return shifting_contact(bites + slides, depth_db=3)


def scene():
    """Grater and hands close to the microphones with a little reverb, the motor and room tone behind."""
    touches = handling(GRIPS, STEEL_COLOUR, GRIP_MODES) + handling(TOUCHES, BRUSH_COLOUR, SHRED_MODES)
    close = shifting_contact(touches, depth_db=1.1) + grating() + hollow_box()
    for rows, modes in (SCRAPE, SCRAPE_MODES), (BUMPS, BUMP_MODES), (POP, POP_MODES):
        close += handling(rows, BRUSH_COLOUR, modes)
    close += squeak()
    in_room = close + amp(-13) * kitchen_reverb(close)
    return microphones(in_room, NEAR_LIKENESS, NEAR_BALANCE, left_lag_s=-.00012) + motor() + room_air()


def record(dry, top_hz=15750, edge_hz=150):
    """The phone keeps nothing above its band limit."""
    return filtered(dry, lambda hz: np.sin(np.pi / 2 * np.clip((top_hz - hz) / edge_hz + .5, 0, 1)) ** 2)


dry = scene()
out = record(dry)
dump_mix(out)
```